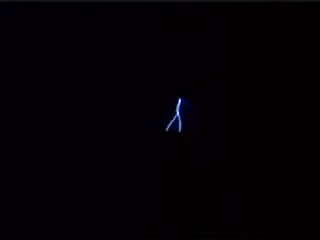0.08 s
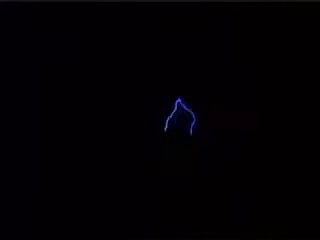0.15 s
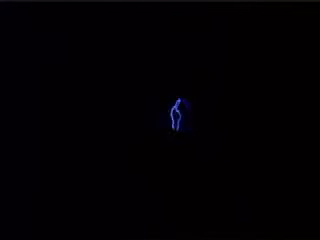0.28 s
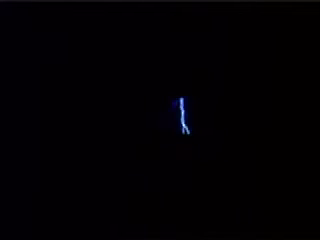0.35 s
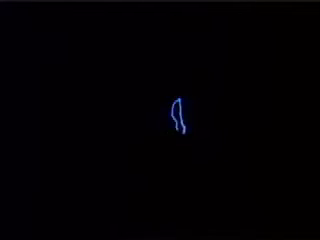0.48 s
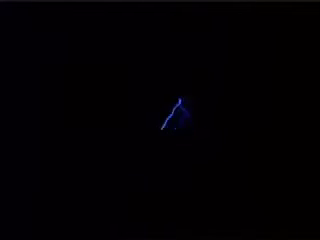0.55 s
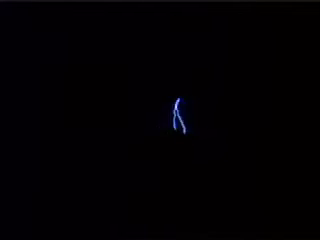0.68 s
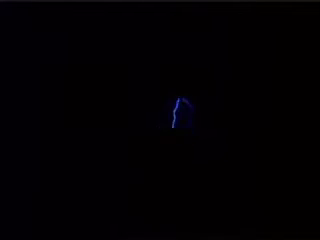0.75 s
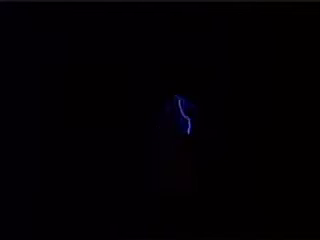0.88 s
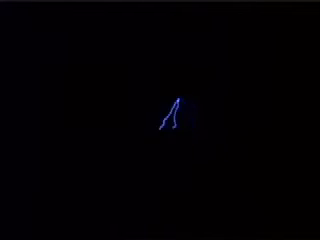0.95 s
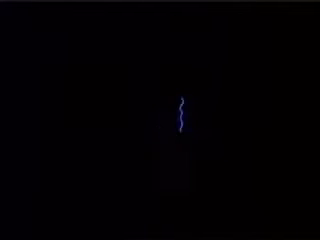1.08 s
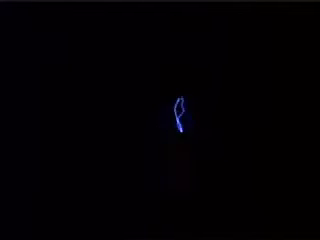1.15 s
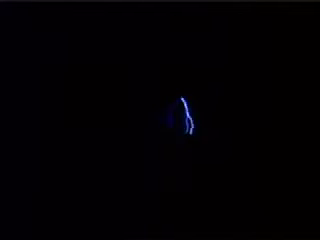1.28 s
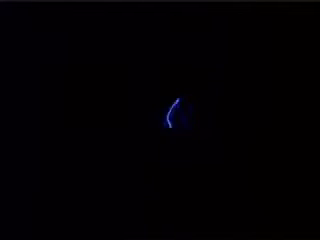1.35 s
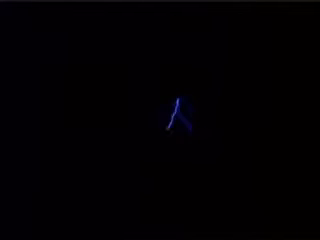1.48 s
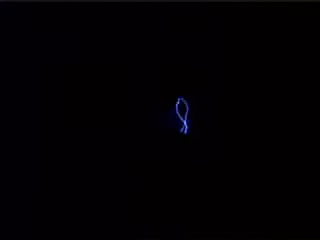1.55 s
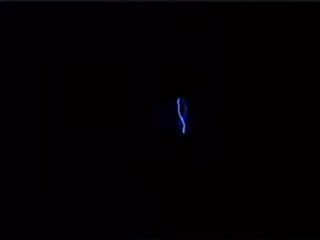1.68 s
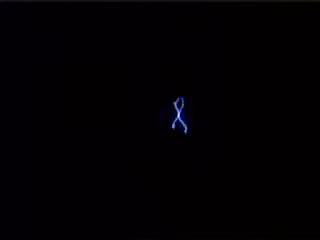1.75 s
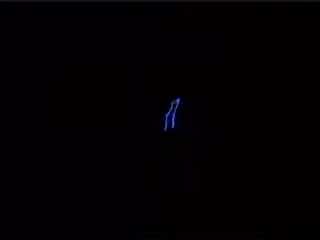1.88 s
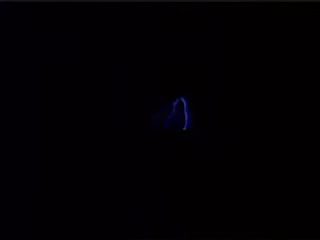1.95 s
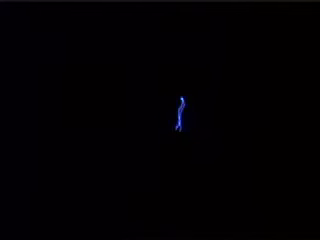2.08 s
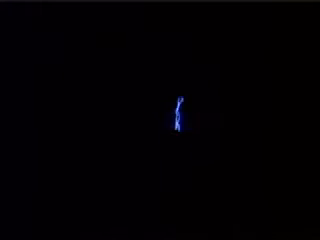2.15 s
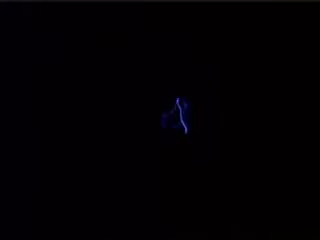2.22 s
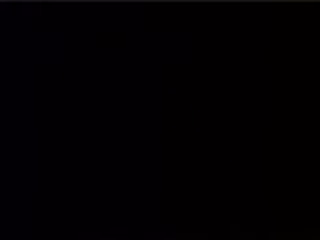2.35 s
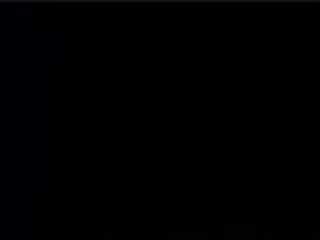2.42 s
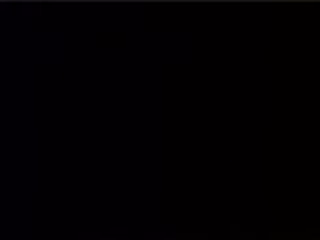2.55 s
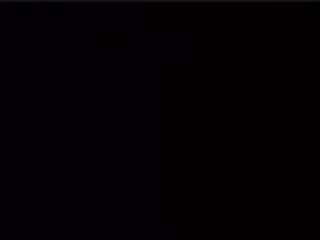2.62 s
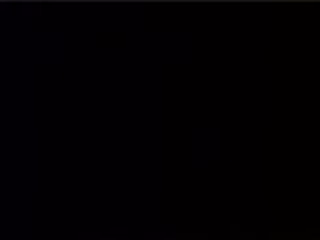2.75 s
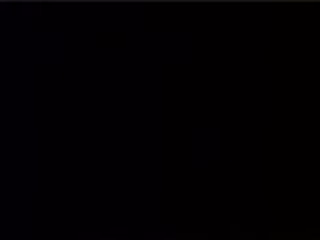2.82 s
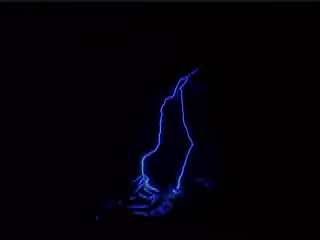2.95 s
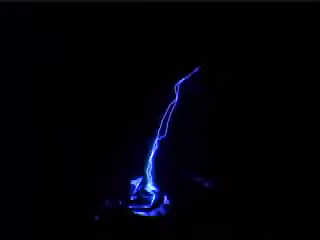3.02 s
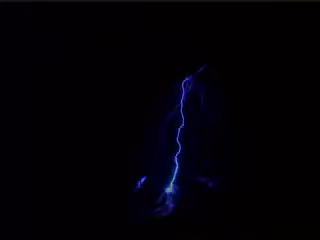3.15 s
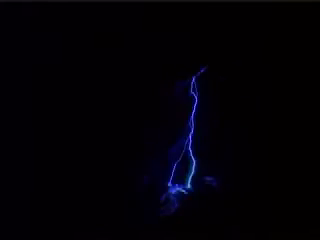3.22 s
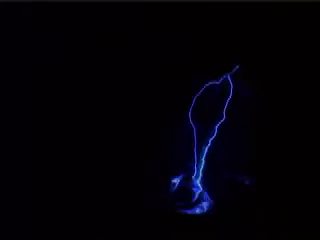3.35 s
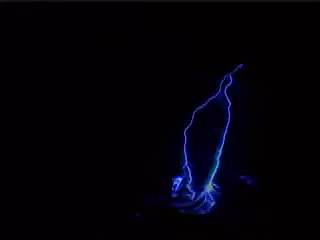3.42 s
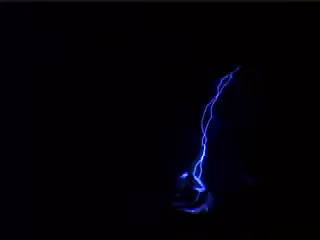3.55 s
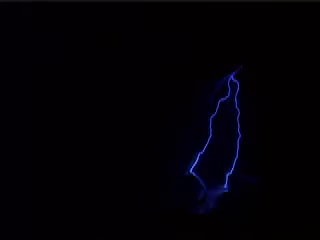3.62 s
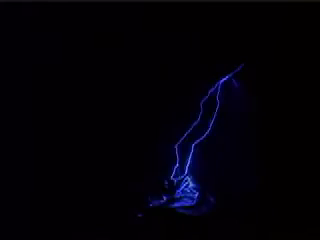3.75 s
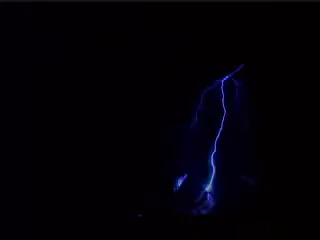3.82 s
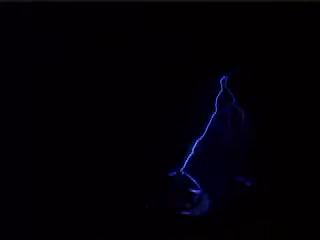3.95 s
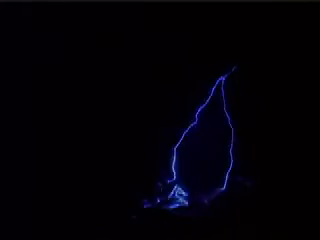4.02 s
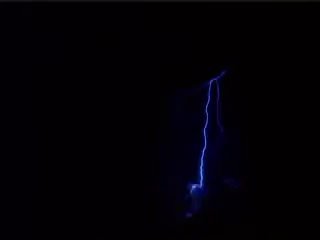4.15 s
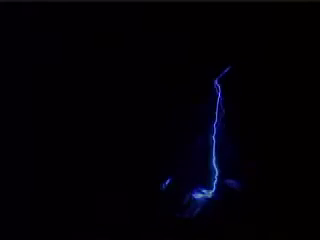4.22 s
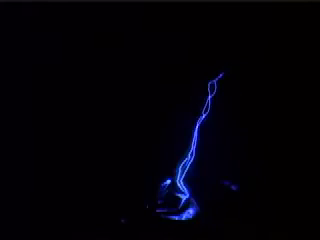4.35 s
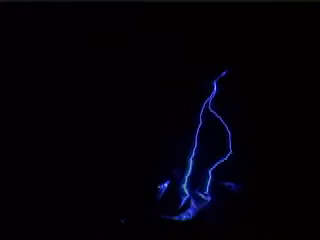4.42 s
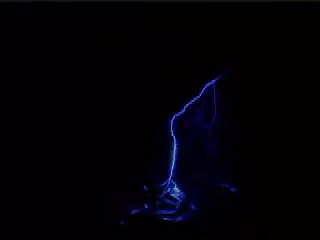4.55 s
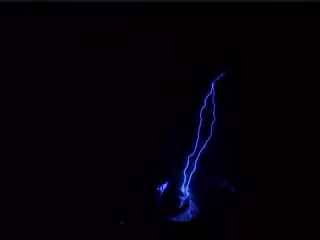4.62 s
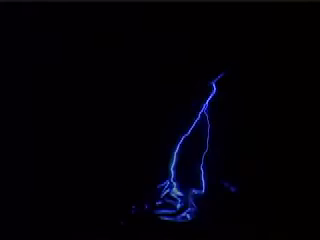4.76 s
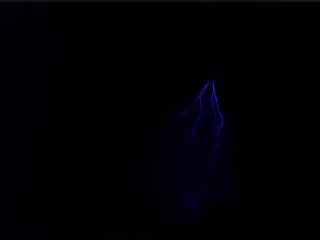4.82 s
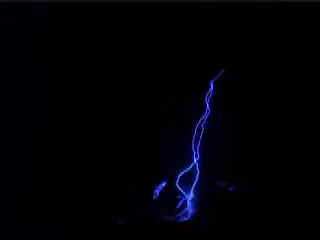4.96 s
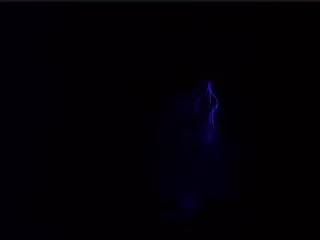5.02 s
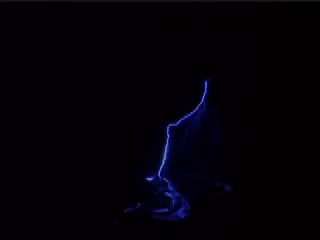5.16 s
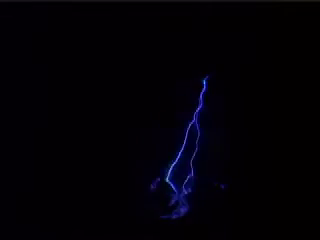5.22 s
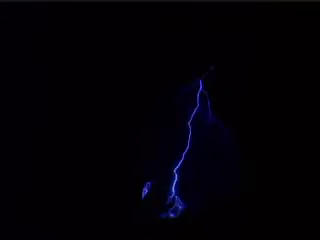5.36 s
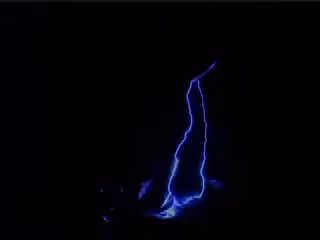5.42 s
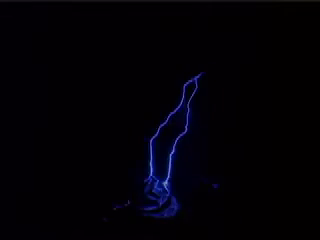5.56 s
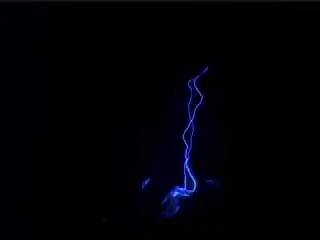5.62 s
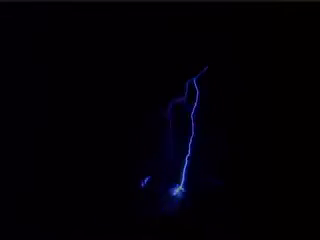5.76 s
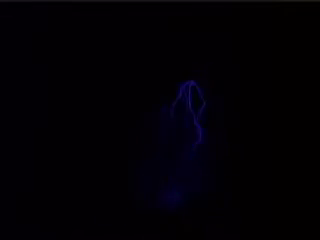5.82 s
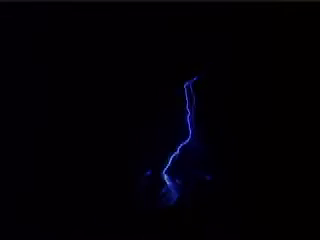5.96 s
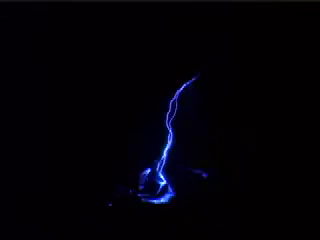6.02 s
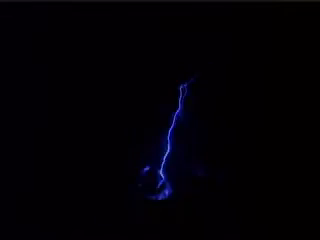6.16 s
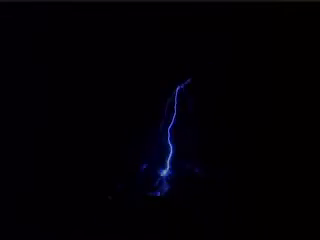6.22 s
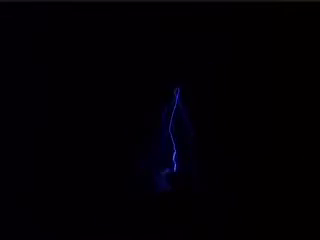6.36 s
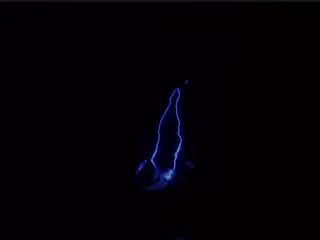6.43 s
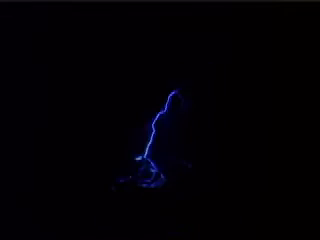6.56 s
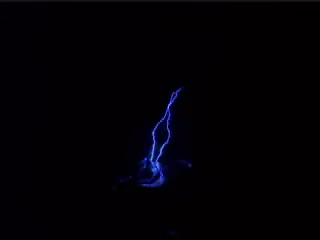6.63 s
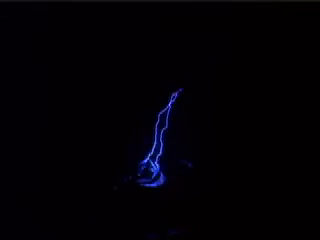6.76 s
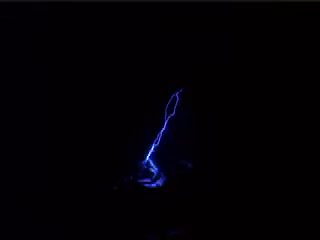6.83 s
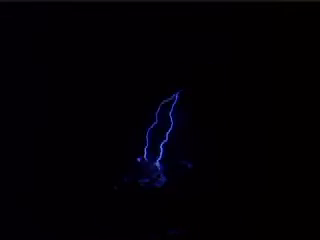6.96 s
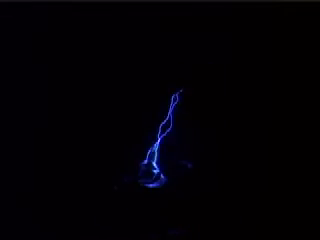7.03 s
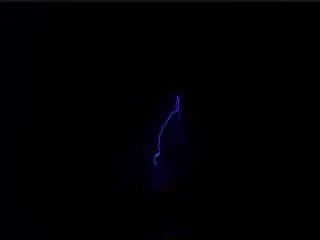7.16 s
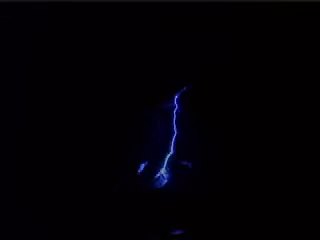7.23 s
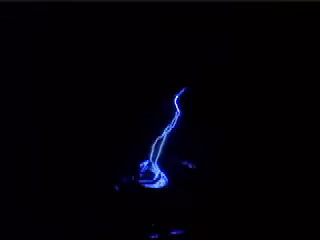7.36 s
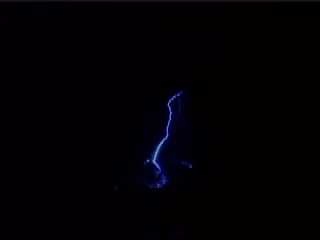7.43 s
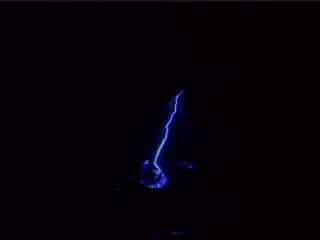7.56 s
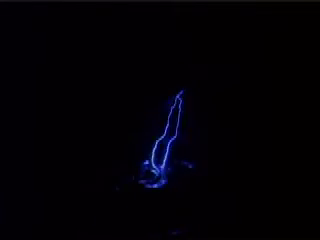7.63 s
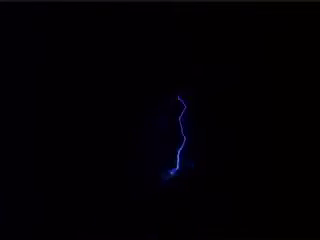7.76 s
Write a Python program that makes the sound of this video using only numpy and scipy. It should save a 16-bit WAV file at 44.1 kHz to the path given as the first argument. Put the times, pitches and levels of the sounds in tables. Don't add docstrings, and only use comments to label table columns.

```python
import sys
import numpy as np
from scipy import signal
from scipy.fft import rfft, irfft
from scipy.io import wavfile

SR = 44100
rng = np.random.default_rng(int(sys.argv[2]) if len(sys.argv) > 2 else 0)


def to_linear_factor(level_db):
    exponent = np.asarray(level_db, float) / 20
    return 10 ** exponent


def transcribe(signal):
    frames = np.atleast_2d(signal).T
    limited = np.clip(frames, -1, 1)
    pcm = np.round(limited * 32767).astype(np.int16)
    wavfile.write(sys.argv[1], SR, pcm)


N = 343959
MAINS_HZ = 50
LEAD = SR // 5

# (first spark [s], last spark [s], lateness [ms])
FAR_RUNS = [(-.1518, .428, .35), (.448, .928, .35), (.958, .958, 0), (.988, 1.028, .3), (1.052, 1.052, 0),
            (1.057, 1.078, .3), (1.108, 1.108, 0), (1.131, 1.131, 0), (1.148, 1.168, 0), (1.197, 1.197, 0),
            (1.239, 1.398, .4), (1.418, 1.9377, .2), (1.9577, 2.4575, .2)]
FAR_RUN_DB = [-7.5, -7, -9.5, -8.5, -5.5, -11, -9, -9.5, -6, -17, -7.5, -8, -8]
# (time [s], change [dB])
UNEVEN = [(.168, -0.5), (.448, 1.5), (.548, 1.5), (.568, -3), (.628, -3.5), (.688, -6), (.728, -5.5),
          (.788, -10), (.888, -4.5), (1.078, 2.5), (1.108, -0.5), (1.131, 3), (1.197, 4), (1.259, 1),
          (1.279, -1.5), (1.299, -2.5), (1.318, -1.5), (1.339, 0.5), (1.358, -1.5), (1.379, -1.5)]
# (frequency [Hz], density [dB per Hz])
FAR_CRACK = [(300, -16), (1000, -25.5), (2500, -8.5), (5500, -0.5), (8500, 2), (11500, 0), (13800, -12),
             (15000, -52)]
FAR_DELAYS_MS = [
    -.8,
    .6,
    4.5,
    5.2,
    6.3,
    10.4,
    14.6,
]
# (smear [ms], left level [dB], right level [dB])
FAR_ECHOES = [(0.9, -15, -14), (0.033, -14, -2), (0.13, -38, -8), (0.61, -33, -3), (.2, -10, -3),
              (0.071, -15, -11), (0.3, -20, -16)]
# (frequency [Hz], density [dB per Hz])
FAR_ROOM = [(100, -43), (330, -22), (570, -23), (730, -22), (950, -15), (1350, -18.5), (2000, -12),
            (3500, -8.5), (5000, -4.5), (6300, -5), (8000, -3), (10500, -6), (13500, -9), (15000, -54)]
# (frequency [Hz], width [Hz], level [dB])
FAR_RINGS = [(1287, 44, 2.5), (5130, 48, -16), (6110, 56, 2.5), (6320, 60, 2), (8060, 27, -2),
             (9700, 90, 2)]
# (time [s], thump level [dB])
FAR_STRIKES = [
    (.368, -5),
    (.428, -8),
    (1.239, -2),
    (1.279, -14),
    (1.578, -2),
    (1.598, -9),
]
# (frequency [Hz], width [Hz], level [dB])
CABINET = [
    (520, 75, 19),
    (400, 28, 11),
]


def far_coil():
    s, db, _ = firing(FAR_RUNS, FAR_RUN_DB, scatter_db=0.64)
    when, change_db = np.transpose(UNEVEN)
    uneven = nearest(s, when)
    db[uneven] += change_db
    answers = room(FAR_ROOM, t60=0.25, onset_ms=4.2, count=5)
    sound = sparks(s, db + 3.5, FAR_CRACK, zip(FAR_DELAYS_MS, FAR_ECHOES), answers, FAR_RINGS,
                   front=[0.51, 0.34, 0.29, 0.8, -1.21], rough=1.0, smear_ms=0.37,
                   room_db=9, pan_db=-1.5, steady=0.78)

    crack_db = -17 + 3 * rng.standard_normal(len(s))
    when, strike_db = np.transpose(FAR_STRIKES)
    crack_db[nearest(s, when)] = strike_db - 4.5
    wall_db = -13.5 + 2.7 * rng.standard_normal(len(s))
    wall_db[uneven] -= 9
    sound = sound + thump(s, crack_db, pan_db=-22.0) + thump(s + .0045, wall_db, pan_db=-20.0)

    knock = -train(s + .0052, to_linear_factor(db)[:, None])
    for hz, width_hz, gain_db in CABINET:
        sound = sound + to_linear_factor(gain_db) * ring(ring(knock, hz, 2 * width_hz), hz, width_hz)
    return sound


# (first spark [s], last spark [s], lateness [ms])
NEAR_RUNS = [(3.0165, 3.0165, 0), (3.0331, 3.5931, .7), (3.6229, 3.6229, 0), (3.6531, 3.9531, .6),
             (3.9836, 3.9836, 0), (4.0137, 4.0137, 0), (4.0436, 4.3234, .3), (4.3434, 4.9834, .15),
             (5.0034, 5.9434, .15), (5.9735, 6.0335, .3), (6.0636, 6.5034, .15), (6.5234, 7.3034, .15),
             (7.3334, 7.7934, .6)]
NEAR_RUN_DB = [-11, -6, -8.5, -5.5, -5, -8.5, -6.5, -7, -7, -5, -7, -7, -5.5]
# (frequency [Hz], density [dB per Hz])
NEAR_CRACK = [(300, -48), (1000, -4.5), (2500, -6.5), (5000, 0), (8500, 4), (11500, -1.5), (14000, -9.5),
              (16000, -33.5)]
NEAR_DELAYS_MS = [
    -1.0,
    .5,
    2.3,
    4.0,
    4.7,
    5.6,
]
# (smear [ms], left level [dB], right level [dB])
NEAR_ECHOES = [(0.1, -9, -16), (0.19, -21, -18), (0.56, 4.5, 0), (0.07, -8.5, -5.5), (0.21, -6, -10.5),
               (1.2, -13, 1)]
# (frequency [Hz], density [dB per Hz])
NEAR_ROOM = [(100, -23.5), (480, -11), (680, -15.5), (900, -8), (1350, -8.5), (1900, -9), (3000, -5),
             (4300, 1.5), (6500, -1.5), (8700, 2.5), (11000, -3), (13500, -9), (15500, -43)]
# (frequency [Hz], width [Hz], level [dB])
NEAR_RINGS = [(1364, 27, -1.5), (3327, 37, -4), (4020, 60, -7), (4690, 35, -6), (7870, 84, -19),
              (10500, 78, -12)]
# (first [s], last [s])
LULLS = [(3.01, 3.02), (3.05, 3.08), (3.17, 3.20), (3.27, 3.30), (3.33, 3.36), (3.39, 3.42), (3.59, 3.60),
         (3.65, 3.68), (3.73, 3.76), (4.01, 4.05), (4.08, 4.11), (4.44, 4.47), (4.64, 4.69), (4.78, 4.81),
         (4.84, 4.89), (4.92, 4.99), (5.12, 5.21), (5.28, 5.31), (5.50, 5.53), (5.58, 5.61), (5.90, 6.00),
         (6.30, 6.33), (6.42, 6.49), (6.52, 6.55), (6.58, 6.61), (6.66, 6.73), (6.92, 6.97), (7.08, 7.11),
         (7.20, 7.31), (7.65, 7.68)]
MISSES = [3.834, 3.874, 3.914, 3.954, 4.144, 4.204, 4.244, 4.304, 4.344, 4.384, 4.584, 5.023, 5.443, 5.643,
          5.683, 5.783, 6.034, 6.104, 6.264, 6.364, 6.784, 6.824, 6.864, 7.144, 7.354, 7.394, 7.434, 7.594,
          7.724, 7.754]


def near_coil():
    s, db, restless = firing(NEAR_RUNS, NEAR_RUN_DB, scatter_db=0.91)
    answers = room(NEAR_ROOM, t60=0.24, onset_ms=0.33, count=5)
    sound = sparks(s, db + 3.5, NEAR_CRACK, zip(NEAR_DELAYS_MS, NEAR_ECHOES), answers, NEAR_RINGS,
                   front=[1.4], rough=0.51, smear_ms=0.073, room_db=5.0, pan_db=-0.1, steady=0.61)

    first, last = np.transpose(LULLS + [(miss - .012, miss + .012) for miss in MISSES])
    short = np.any((s[:, None] > first) & (s[:, None] < last), axis=1)
    weakness = np.abs(rng.standard_normal(len(s)))
    graze_db = -8.5 - 13 * weakness
    strike_db = 5 - 3.5 * weakness
    click_db = np.where(short, graze_db, strike_db)
    sound = sound + thump(s, click_db + 2.1 * restless, pan_db=-1.5)

    flare_db = db + 17 + 3.5 * rng.standard_normal(len(s))
    size = (restless * to_linear_factor(flare_db))[:, None]
    flare = [train(s + 0.002, size * crooked(len(s), smear_ms=.7)) for _ in range(2)]
    return sound + ring(np.array(flare), hz=5130, width_hz=1000)


def firing(runs, runs_db, scatter_db):
    s, db, restless = [], [], []
    for (first, last, late_ms), run_db in zip(runs, runs_db):
        count = round((last - first) * MAINS_HZ) + 1
        lateness, luck = rng.standard_normal((2, count))
        s.append(np.linspace(first, last, count) + np.abs(lateness) * late_ms / 1000)
        db.append(run_db + scatter_db * luck)
        restless.append(np.full(count, late_ms))
    s = np.concatenate(s)
    slipped = np.diff(s, prepend=s[0]) * MAINS_HZ > 1.25
    return s, np.concatenate(db) + 2 * slipped, np.concatenate(restless) + slipped / 2


def sparks(s, db, crack, echoes, answers, rings, front, rough, smear_ms, room_db, pan_db, steady):
    size = to_linear_factor(db)[:, None]
    fresh = np.sqrt(1 - steady ** 2)
    shock = rough * crooked(len(s), smear_ms)
    shock[:, :len(front)] = front
    dry = np.array([train(s, size * (shock + 0.64 * crooked(len(s), smear_ms))) for _ in range(2)])

    for delay_ms, (spread_ms, *ear_db) in echoes:
        shape = steady * crooked(1, spread_ms) + fresh * crooked(len(s), spread_ms)
        bounce = size * shape * to_linear_factor(0.94 * rng.standard_normal((len(s), 1)))
        dry = dry + to_linear_factor(np.array(ear_db))[:, None] * train(s + delay_ms / 1000, bounce)

    share = rng.standard_normal((len(s), len(answers)))
    share *= fresh / np.sqrt(np.sum(share[:, 1:] ** 2, axis=1, keepdims=True))
    share[:, 0] = steady
    wet = np.zeros((2, N + LEAD))
    for k, answer in enumerate(answers):
        drive = train(s, size * share[:, [k]])
        wet += signal.oaconvolve(drive[None], answer, axes=1)[:, :N + LEAD]
    wet = wet + sum(to_linear_factor(gain_db + 3.5) * ring(wet, hz, width_hz) for hz, width_hz, gain_db in rings)
    return colour(dry, crack) + to_linear_factor(room_db + np.array([[pan_db], [-pan_db]]) / 2) * wet


def crooked(count, smear_ms, size=96):
    fade = np.exp(-(np.arange(size) / (max(smear_ms, .02) * SR / 700)) ** 2)
    clicks = rng.standard_normal((count, size)) * fade
    return unit_energy(clicks)


def unit_energy(clicks):
    return clicks / np.sqrt(np.sum(clicks ** 2, axis=1, keepdims=True))


def thump(s, db, pan_db):
    click = train(s, to_linear_factor(db)[:, None])
    click = signal.sosfilt(signal.butter(2, 7000, fs=SR, output="sos"), click)
    click = click + to_linear_factor(-6) * signal.sosfilt(signal.butter(1, 110, fs=SR, output="sos"), click)
    click = signal.sosfilt(signal.butter(1, 13, "high", fs=SR, output="sos"), click)
    return click * to_linear_factor(np.array([[pan_db], [-pan_db]]) / 2)


def ring(x, hz, width_hz):
    return signal.lfilter(*signal.iirpeak(hz, hz / width_hz, fs=SR), x)


# (frequency [Hz], share [0-1])
LIKE = [(100, 0), (1000, 0.87), (2500, 0.25), (6000, 0)]


def room(table, t60, onset_ms, count):
    t = np.arange(SR // 2) / SR
    long_fade = to_linear_factor(-60 * t / 0.88)
    fade = (to_linear_factor(-60 * t / t60) + to_linear_factor(-29) * long_fade) * np.clip(t * 1000 / onset_ms, 0, 1)
    hz = np.arange(len(t) // 2 + 1) * SR / len(t)
    like = np.clip(curve(LIKE, hz), 0, 1)
    mid, side = rfft(rng.standard_normal((2, count, 1, len(t))))
    left_right = np.array([[1], [-1]])
    pair = irfft(mid * np.sqrt(1 + like) + side * np.sqrt(1 - like) * left_right) * fade
    dull = signal.lfilter([.4], [1, -.6], pair)
    pair = dull * (1 - long_fade) + pair * long_fade
    return [colour(h, table) / np.sqrt(np.sum(fade ** 2)) for h in pair]


def train(s, shapes):
    at = LEAD + np.round(s * SR).astype(int)[:, None] + np.arange(shapes.shape[1])
    return np.bincount(at.ravel(), shapes.ravel(), N + SR)[:N + LEAD]


def nearest(s, when):
    return np.argmin(np.abs(s[:, None] - when), axis=0)


def curve(table, hz):
    f, v = np.transpose(table)
    return np.interp(np.log(np.maximum(hz, 1)), np.log(f), v)


def colour(x, table, size=4096):
    cep = irfft(np.log(to_linear_factor(curve(table, np.arange(size // 2 + 1) * SR / size))))
    cep[1:size // 2] *= 2
    cep[size // 2 + 1:] = 0
    h = irfft(np.exp(rfft(cep)))
    h = h / np.sqrt(np.sum(h ** 2))
    return signal.oaconvolve(np.atleast_2d(x), h[None], axes=1)[:, :np.shape(x)[-1]]


WHINE_ORDERS = [1, 2, 4, 6, 21, 28, 39, 41, 42, 43, 49, 52, 58, 63]
WHINE_DB = [-78, -77, -79, -76, -79, -81, -79, -78, -72, -77, -78, -76, -80, -78]


def supply_whine():
    order = np.arange(1, 97)
    db = -82 - order / 30
    db[np.array(WHINE_ORDERS) - 1] = WHINE_DB
    start = rng.standard_normal(len(order))
    t = np.arange(SR // MAINS_HZ)[:, None] / SR
    cycle = 3 * MAINS_HZ * order * t + start
    sides = []
    for _ in range(2):
        level_db, shift = rng.standard_normal((2, len(order)))
        lines = np.sin(2 * np.pi * (cycle + shift / 12))
        sides.append(np.resize(lines @ to_linear_factor(db + level_db), N))
    return np.array(sides)


# (frequency [Hz], density [dB per Hz])
HUSH = [(18, -27), (30, 5), (388, -11), (602, -10), (668, -14), (888, -13), (2840, -20.5), (6340, -17),
        (14500, -22)]


def hush():
    return to_linear_factor(-63.5) * colour(rng.standard_normal((2, N)), HUSH)


def scene():
    far = signal.sosfilt(signal.butter(10, 14300, fs=SR, output="sos"), far_coil())
    return (far + near_coil())[:, LEAD:] + supply_whine() + hush()


def roll_off(x):
    return signal.sosfilt(signal.butter(12, 15790, fs=SR, output="sos"), x)


def record(dry):
    rounded = 1.265 * np.tanh(dry / 1.33)
    mix = signal.sosfilt(signal.butter(12, 14800, fs=SR, output="sos"), rounded)
    return roll_off(mix)


dry = scene()
out = record(dry)
transcribe(out)
```